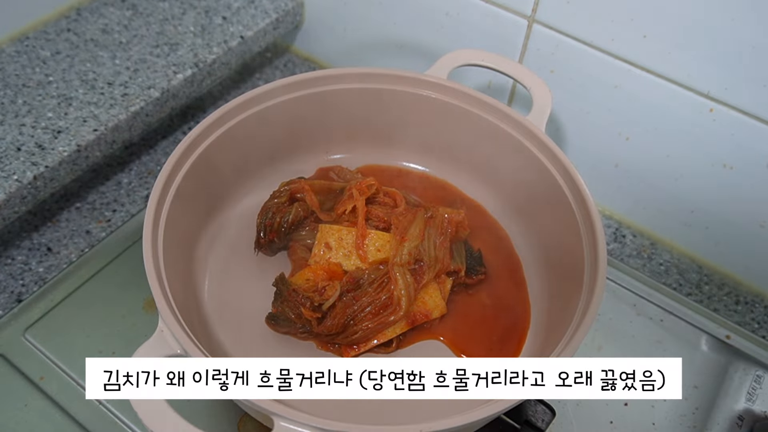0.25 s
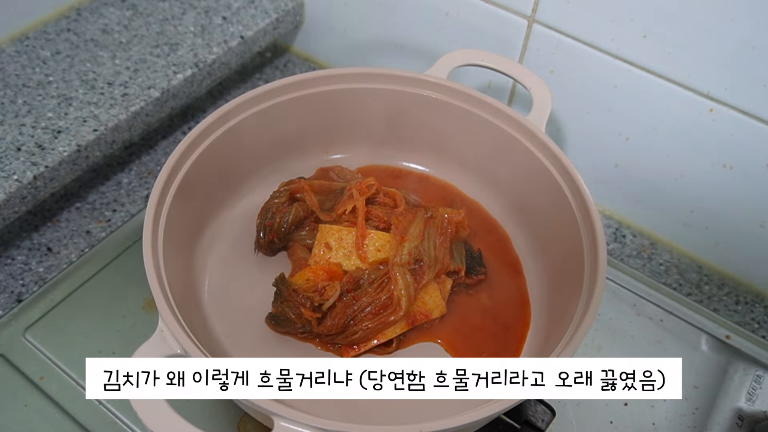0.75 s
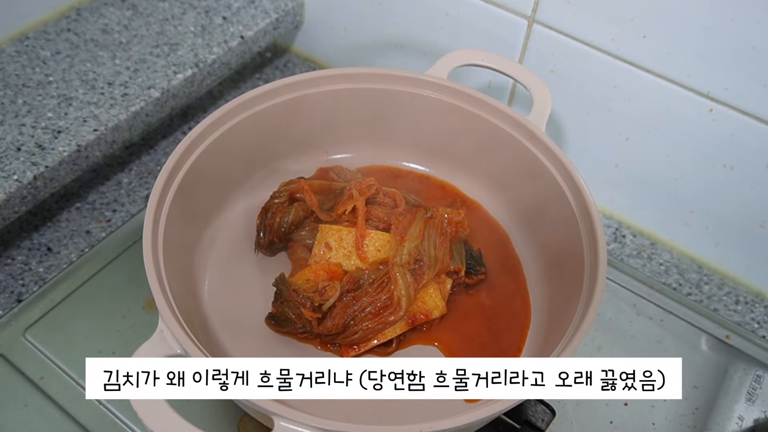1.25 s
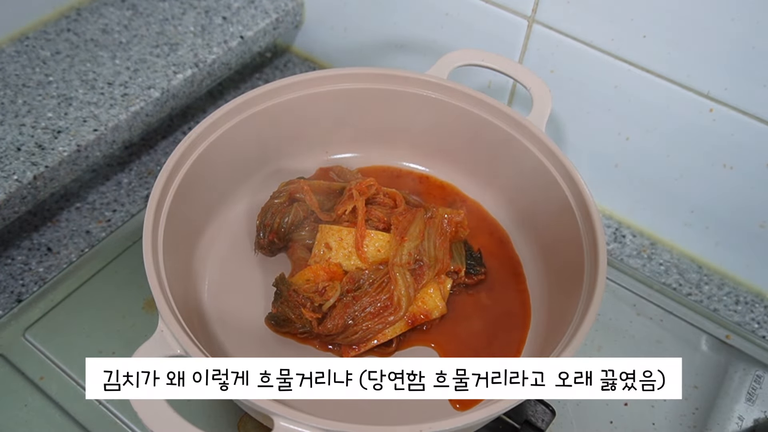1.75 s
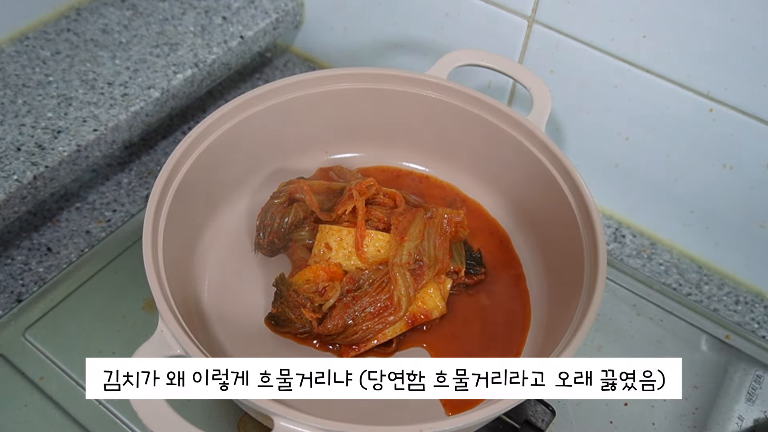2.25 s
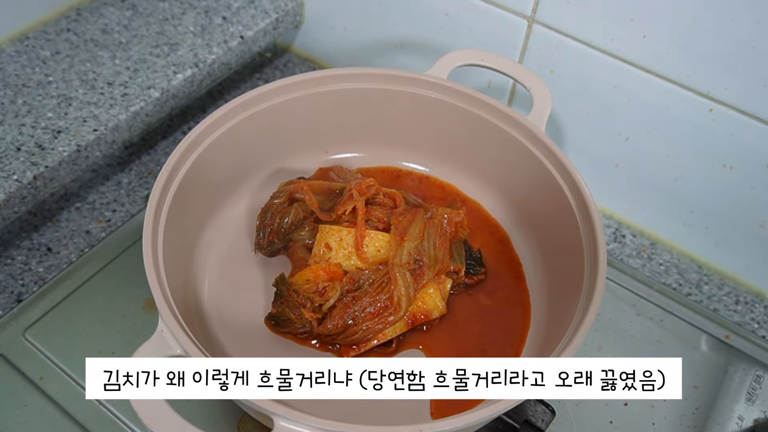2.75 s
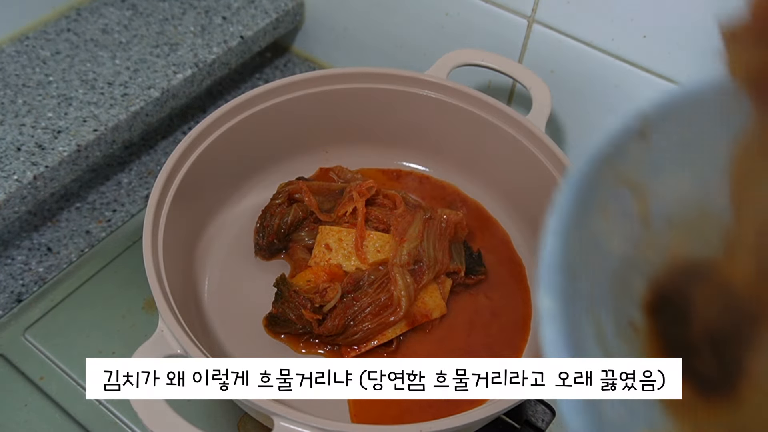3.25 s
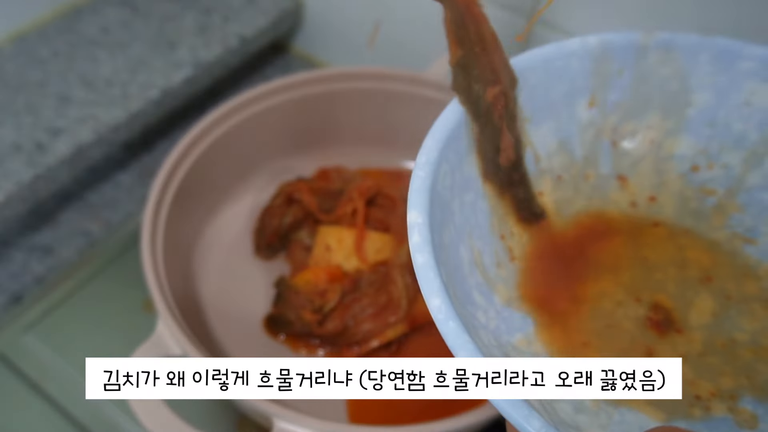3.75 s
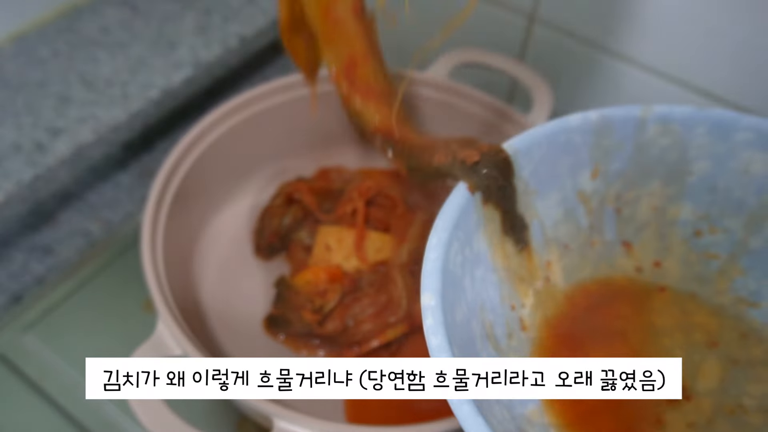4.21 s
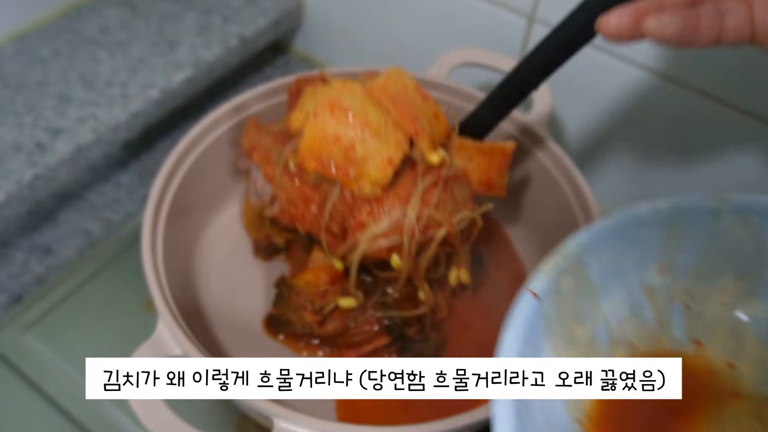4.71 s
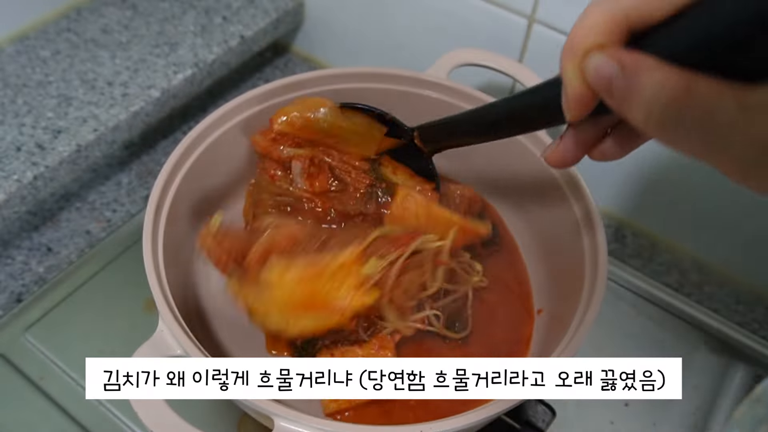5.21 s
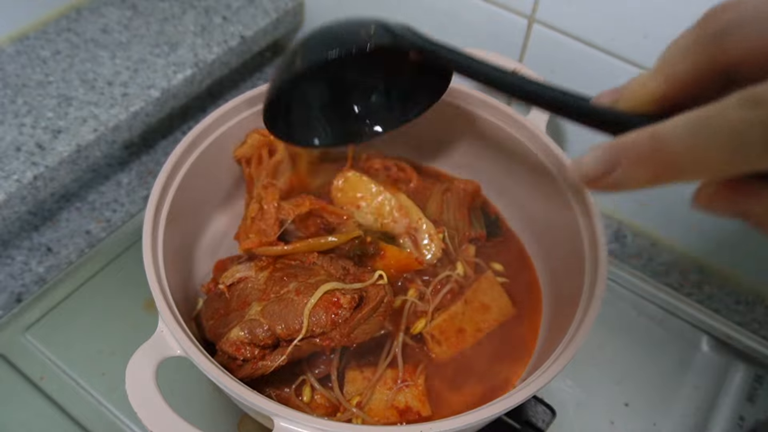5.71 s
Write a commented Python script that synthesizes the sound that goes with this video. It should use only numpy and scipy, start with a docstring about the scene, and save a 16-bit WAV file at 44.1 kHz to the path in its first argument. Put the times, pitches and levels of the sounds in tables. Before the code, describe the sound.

A gas hob is lit at close range: knob knocks and a hollow case thump, then sharp, bright igniter ticks about ten a second, with low ignition puffs among them. The ticking stops and a soft steady flame remains over quiet room tone. Later, sauce drips and a crisp splat lead into soggy cabbage slopping into the pot with wet pops and small bubbles. Mono, short bright kitchen echo.

```python
"""Lighting the hob under kimchi stew

Close up in a small tiled kitchen, a hob knob clunks in: band-shaped knocks over a thumping, ringing metal case.
An igniter snaps about ten times a second, each spark a cluster of reflections coloured by the pot and burner.
The gas catches in three low noise puffs and burns on as a flickering noise roar and a resonant hiss.
Wet kimchi is then ladled from bowl to pot: swells of sloshing noise and bubble chirps, with pops and splats."""
import sys
import numpy as np
from scipy import signal
from scipy.fft import rfft, irfft
from scipy.io import wavfile

SR = 44100
rng = np.random.default_rng(int(sys.argv[2]) if len(sys.argv) > 2 else 0)


def unload_audio(sound):
    """Save the sound as a 16-bit wav file, at the path given as the first command line argument."""
    columns = np.transpose(np.atleast_2d(sound))
    # keep every value between -1 and 1, then stretch to whole-number steps
    steps = np.round(np.clip(columns, -1, 1) * 32767)
    wavfile.write(sys.argv[1], SR, steps.astype(np.int16))


N = 263277
TIME = np.arange(N) / SR

# Kitchen reverberation: [f/Hz, t60/s]
KITCHEN_DECAY = [(150, 0.29), (1200, 0.36), (3000, 0.25), (7000, 0.24), (15000, 0.23)]
# Room tone, relative spectrum: [f/Hz, level/dB per Hz]
ROOM_TONE_SPECTRUM = [(25, -4), (120, 0), (400, -15.5), (1100, -4), (2100, -10.5), (4500, -29), (9000, -24),
                      (15500, -27), (16200, -55)]

# Knocks of the knob and its valve: [t/s, level/dB over the first 5 ms, centre f/Hz, width/octaves, t60/s]
KNOB_KNOCKS = [(.0005, -40.5, 596, 1.06, 0.11), (0.0162, -31.5, 205, 1, 0.14),
               (0.0217, -35.5, 1492, 0.64, 0.13), (0.044, -38, 3450, 0.77, 0.072),
               (0.0504, -39.5, 704, 0.19, 0.057), (.776, -39, 680, 0.26, 0.099),
               (0.7994, -16, 2410, 0.22, 0.004), (0.8006, -21.5, 2400, 0.74, 0.045),
               (.809, -30, 644, 0.41, 0.036)]
# Jolts of the sheet-metal case; the thump level is before its build-up:
# [t/s, thump level/dB, ring level/dB, build-up/s, thump t60/s]
CASE_JOLTS = [(0.0253, -18, -56, 0.072, 0.31), (0.0442, -40, -37, .02, 0.28),
              (0.821, -28.5, -36, 0.013, 0.16)]
# Ringing modes of the case, relative to the ring level: [f/Hz, level/dB, t60/s]
CASE_MODES = [(340, -8.5, 0.22), (670, 1.5, 0.15), (1130, -11, 0.3), (2520, -0.5, 0.05), (2880, 4.5, 0.049),
              (3214, -7, 0.066), (4070, 2, 0.1), (4320, -4, 0.094), (4600, -2, 0.066), (4940, -4, 0.087)]
CASE_THUMP_HZ = 53.5

# Spark colour between burner and pot, in fully heated air: [f/Hz, level/dB]
SPARK_SPECTRUM = [(150, -30.5), (350, -22), (580, -13.5), (830, -14.5), (1200, -3.5), (1850, -7),
                  (2300, -9), (3000, -10), (4300, -2.5), (5600, -1.5), (6800, 1.5), (10200, -0.5),
                  (12300, -13.5), (15500, -10.5)]
# Resonances and notches of the pot and burner cap: [f/Hz, width/Hz, level/dB]
POT_MODES = [(408, 82, -11), (500, 30, 5), (685, 42, 8), (1420, 55, 4.5), (1780, 68, 5), (2163, 224, -9.5),
             (4210, 370, 1.5), (5320, 220, 2.5), (6640, 230, 7.5), (7220, 130, 7), (7783, 94, 3.5),
             (8800, 100, 0)]
# The flame heats the air round the igniter: [t/s, speed of sound as a share of its hot value]
AIR_HEATING = [(.42, 0.93), (.52, 1), (1.3, 1)]
# Spark strength over time: [t/s, level/dB]
SPARK_STRENGTH = [(0.25, -21), (0.5, -19.5), (1.0, -19.5), (1.32, -21), (1.75, -19.5), (2.33, -20)]
# A steady pace, but the first few gaps are shorter, gaining HURRY_S in all
FIRST_SPARK_S, SPARK_PERIOD_S, HURRY_S, SETTLE_S = 0.2102, 0.10112, 0.0048, 0.273

# Roar of the steady flame, relative spectrum: [f/Hz, level/dB per Hz]
ROAR_SPECTRUM = [(20, -19), (45, -12.5), (90, -0.5), (140, 0.5), (250, -6), (420, -16), (700, -8),
                 (850, -22.5), (1150, -10), (1450, -13), (1650, -20), (1900, -10.5), (2200, -40),
                 (4000, -56)]
# Hiss of the gas jet, relative spectrum before its resonances: [f/Hz, level/dB per Hz]
HISS_SPECTRUM = [(1200, 1), (2600, -8), (3400, 0), (5000, -2.5), (6300, 2.5), (8500, -3), (10200, -5),
                 (13000, -10.5), (15500, -10), (16200, -33)]
# Whistling resonances of the gas jet: [f/Hz, width/Hz, level/dB]
JET_MODES = [(4400, 650, 6.5), (5600, 580, 6), (7700, 490, 5.5), (9400, 220, 3.5), (10970, 620, 7),
             (12300, 320, 7), (13950, 600, 6)]
# Flame strength over time: [t/s, level/dB]
FLAME_STRENGTH = [(.43, 2), (2.5, -1), (2.85, -0.5), (3.1, 0.5), (3.45, .5), (3.9, -1), (4.4, 0.5),
                  (5.2, 0), (5.97, 0)]
LIT_S = 0.37
# Puffs as the flame runs round the burner: [t/s, level/dB, length/s, brightness/dB per octave]
IGNITION_PUFFS = [(0.419, -25, 0.038, -1), (0.474, -25.5, 0.045, 1), (0.531, -25, 0.03, 1)]
# Colour shared by the puffs, before each one's brightness tilt: [f/Hz, level/dB]
PUFF_SPECTRUM = [(25, -18), (70, -6), (110, -4.5), (145, 3.5), (200, 2), (270, 1), (410, -12), (500, -6),
                 (670, -5), (830, -10.5), (1400, -14.5), (2200, -32), (3000, -31), (5000, -52)]

# Knock of the bowl being picked up: [level/dB over the first 5 ms, centre f/Hz, width/octaves, t60/s]
BOWL_KNOCK = (-44.5, 1098, 0.35, 0.37)
BOWL_S = 2.6235
# Food moves (bowl brought over, scoop, lift, soft slosh, drop, spread, last slop):
# [peak t/s, rise/s, fall/s, slosh level/dB, squelch level/dB, prickle level/dB]
FOOD_MOVES = [(3.22, 0.25, 0.14, -58, -69, -74), (4.785, 0.024, 0.051, -50.5, -63, -69),
              (4.94, 0.11, 0.049, -58, -58.5, -53), (5.07, 0.069, 0.037, -51, -57, -67),
              (5.32, 0.04, 0.076, -44, -45, -54), (5.58, 0.31, 0.49, -48, -57.5, -60),
              (5.91, 0.023, 0.032, -39.5, -49.5, -74)]
# Colour of sloshing, relative spectrum: [f/Hz, level/dB]
SLOSH_SPECTRUM = [(90, -19), (160, 0), (260, -9), (380, -19), (480, -3), (680, 1), (860, -4), (1150, 4),
                  (1900, -0.5), (2300, -8.5), (3500, -9.5), (7000, -23)]
# Low bumps as the pot is nudged: [peak t/s, rise and fall/s, level/dB]
POT_NUDGES = [(4.57, 0.05, -49), (4.798, 0.05, -53), (5.447, 0.084, -47.5), (5.93, 0.04, -54)]
# Loudest wet pops of the kimchi: [t/s, level/dB over the first 5 ms, centre f/Hz, width/octaves]
LEAF_POPS = [(3.1063, -46, 3540, 0.34), (4.711, -47, 2470, 0.17), (4.804, -44.5, 4840, 0.22),
             (4.908, -40.5, 1200, 0.12), (4.9676, -44.5, 7800, 0.33), (5.252, -35, 2270, 0.4),
             (5.267, -41, 1710, 0.93), (5.279, -31.5, 1360, 0.38), (5.3068, -32.5, 1570, 0.87),
             (5.344, -31, 3970, 0.37), (5.361, -38.5, 1810, 0.59), (5.389, -40.5, 4400, 0.38),
             (5.436, -41, 3710, 0.22), (5.4716, -42, 2250, 0.3), (5.607, -44, 3500, 0.056),
             (5.67, -42, 6330, 0.13), (5.7156, -43.5, 6580, 0.1), (5.9184, -36, 2400, 0.71)]
SIMMER_S = 3.2
# Sauce splatting into the pot: [t/s, level/dB over the first 5 ms, t60/s, brightness/dB per octave]
SAUCE_DRIPS = [(3.6837, -41.5, 0.028, 6), (4.2056, -47, 0.02, 9), (4.45, -42, 0.11, -2),
               (4.507, -39.5, 0.12, -1), (4.518, -26.5, 0.034, 0.5), (5.2007, -39.5, 0.025, -4.5)]
# Colour shared by the splats, before each one's brightness tilt: [f/Hz, level/dB]
SPLAT_SPECTRUM = [(290, -62), (500, -26), (1310, -0.5), (1900, -12.5), (2570, -19), (4130, -0.5),
                  (6180, -10.5), (8360, -4), (9650, -6), (15500, -14)]

BAND_EDGE_HZ = 16100


def gain_of(db):
    """Turns decibels into gain."""
    return 10 ** (np.asarray(db) / 20)


def evened(x):
    """Scales a sound to rms 1."""
    return x / np.sqrt(np.mean(x ** 2) + 1e-20)


def packed(x, seconds):
    """Scales a short sound to the energy of rms 1 held for so many seconds."""
    return x * np.sqrt(seconds * SR / (np.sum(x ** 2) + 1e-20))


def attack_evened(x):
    """Scales a sound so that its first 5 ms have rms 1."""
    return x / np.sqrt(np.mean(x[:SR // 200] ** 2))


def level_at(points, t):
    """Reads a table along time."""
    return np.interp(t, *np.transpose(points))


def read(points, hz):
    """Reads a table along a log-frequency axis."""
    f, value = np.transpose(points)
    return np.interp(np.log(hz + 1), np.log(f + 1), value)


def add(mix, start_s, sound):
    """Mixes a sound in at a given time."""
    part = mix[max(round(start_s * SR), 0):][:len(sound)]
    part += sound[:len(part)]


def dying(t, t60):
    """A decay of 60 dB in t60 seconds."""
    return np.exp(-np.log(1000) * t / t60)


def swell_at(peak_s, rise_s, fall_s):
    """A bell-shaped swell of height 1 with its own rise and fall."""
    width_s = np.where(TIME < peak_s, rise_s, fall_s)
    return np.exp(-.5 * ((TIME - peak_s) / width_s) ** 2)


def hump(hz, centre_hz, octaves):
    """Gain in dB of one broad, rounded peak."""
    distance = np.log2((hz + 1) / centre_hz) / octaves
    return np.maximum(-2 * distance ** 2, -50)


def bumps(modes, hz):
    """Gain in dB of a set of resonances and notches."""
    return sum(db / (1 + (2 * (hz - f) / width) ** 4) for f, width, db in modes)


def low_pass(hz, edge_hz):
    """Gain in dB of a smooth low-pass, 3 dB down at its edge."""
    return -10 * np.log10(1 + (hz / edge_hz) ** 6)


def coloured(x, curve, size=4096):
    """Minimum-phase filter whose gain in dB is curve(Hz), so nothing sounds ahead of its cause."""
    hz = abs(np.fft.fftfreq(size, 1 / SR))
    log_gain = np.log(gain_of(np.maximum(curve(hz), -90)))
    taps = np.fft.ifft(np.exp(np.conj(signal.hilbert(log_gain)))).real
    return signal.fftconvolve(x, taps[:size // 2])[:len(x)]


def noise(curve):
    """Steady noise of rms 1 with the spectrum curve(Hz) in dB."""
    spectrum = rfft(rng.standard_normal(N))
    gain = gain_of(curve(np.fft.rfftfreq(N, 1 / SR)))
    return evened(irfft(spectrum * gain, N))


def waver(edge_hz):
    """Random wandering of rms 1, mostly slower than edge_hz."""
    return noise(lambda hz: low_pass(hz, edge_hz))


def ring(modes, t):
    """Struck modes: dying sines of random sign."""
    out = np.zeros(len(t))
    for hz, db, t60 in modes:
        sign = rng.choice([-1, 1])
        out += sign * gain_of(db) * dying(t, t60) * np.sin(2 * np.pi * hz * t)
    return out


def scatter(t60, size=8192):
    """A dying cluster of reflections with a nearly even spectrum and energy 1."""
    t = np.arange(size) / SR
    x = rng.standard_normal(size) * dying(t, t60)
    # flatten the spectrum, then restore some of the decay
    for _ in range(2):
        z = rfft(x)
        x = irfft(z / (abs(z) + 1e-9)) * dying(t, 2 * t60) ** .5
    return x / np.linalg.norm(x)


def blow(db, centre_hz, octaves, t60):
    """A short knock or smack round one pitch; its level is that of the first 5 ms."""
    knock = coloured(scatter(t60), lambda hz: hump(hz, centre_hz, octaves))
    return gain_of(db) * attack_evened(knock)


def reverberation(size=16384):
    """The kitchen's echo, energy 1: it builds up in a few ms and each band dies at its own speed."""
    hz, t, z = signal.stft(rng.standard_normal(size), SR, nperseg=256)
    decay = dying(t, read(KITCHEN_DECAY, hz)[:, None])
    tail = signal.istft(z * decay, SR, nperseg=256)[1][:size]
    tail *= 1 - np.exp(-np.arange(size) / SR / 0.0015)
    return tail / np.linalg.norm(tail)


def room_tone(tone_db=-58):
    """The quiet, steady noise bed of the kitchen."""
    return gain_of(tone_db) * noise(lambda hz: read(ROOM_TONE_SPECTRUM, hz))


def knob():
    """The knob clunks in and later clicks; the case gives way, thumps and rings under it."""
    t, out = np.arange(SR // 2) / SR, np.zeros(N)
    for start_s, *shape in KNOB_KNOCKS:
        add(out, start_s, blow(*shape))
    for start_s, thump_db, ring_db, build_s, t60 in CASE_JOLTS:
        thump = -np.sin(2 * np.pi * CASE_THUMP_HZ * t) * dying(t, t60) * (1 - np.exp(-t / build_s))
        add(out, start_s, gain_of(thump_db) * thump + gain_of(ring_db) * ring(CASE_MODES, t))
    return out


def crack(db=-14, centre_hz=1250, octaves=0.68):
    """The spark's own pressure pulse, which passes under the pot on its way to the ear."""
    impulse = signal.unit_impulse(16384)
    pulse = coloured(impulse, lambda hz: hump(hz, centre_hz, octaves) + bumps(POT_MODES, hz))
    return gain_of(db) * packed(pulse, .02)


def spark_path(room_db, size=16384, gap_t60=.036, build_s=.0006):
    """One way for a spark to rattle between burner and pot and fill the room."""
    onset = 1 - np.exp(-np.arange(size) / SR / build_s)
    return onset * scatter(gap_t60, size=size) + gain_of(room_db) * reverberation(size)


def igniter(room_db=-7.5, unlike=0.4, count=22):
    """Each spark rattles between burner and pot and fills the room; the paths drift as the air warms."""
    out = np.zeros(N)
    paths = [spark_path(room_db) for _ in range(3)]
    beats = np.arange(count) * SPARK_PERIOD_S
    times = FIRST_SPARK_S + beats - HURRY_S * (1 - np.exp(-beats / SETTLE_S))
    # crossfade through the three paths in turn
    for start_s, warmth in zip(times, np.linspace(0, 2, count)):
        path = sum(np.sqrt(max(1 - abs(warmth - k), 0)) * p for k, p in enumerate(paths))
        # no two sparks jump quite the same way
        path = path + unlike * spark_path(room_db)
        speed = level_at(AIR_HEATING, start_s)
        snap = coloured(path, lambda hz: read(SPARK_SPECTRUM, hz / speed) + bumps(POT_MODES, hz))
        strength = gain_of(level_at(SPARK_STRENGTH, start_s))
        add(out, start_s, strength * (packed(snap, 0.022) + crack()))
    return out


def flame(roar_db=-50.5, hiss_db=-54, flicker_db=1.77, hiss_flicker_db=1.36):
    """Once lit, the flame roars softly and flickers while the jet hisses through the burner's resonances."""
    fade_in = np.clip((TIME - LIT_S) / 0.087, 0, 1)
    strength = gain_of(level_at(FLAME_STRENGTH, TIME)) * fade_in
    roar = noise(lambda hz: read(ROAR_SPECTRUM, hz))
    roar *= gain_of(roar_db + flicker_db * waver(19))
    hiss = noise(lambda hz: read(HISS_SPECTRUM, hz) + bumps(JET_MODES, hz))
    hiss *= gain_of(hiss_db + hiss_flicker_db * waver(16))
    return strength * (roar + hiss)


def ignition(fade_t60=0.057):
    """The gas catches in three low, ragged puffs of noise."""
    t, out = np.arange(SR // 4) / SR, np.zeros(N)
    for start_s, db, length_s, tilt in IGNITION_PUFFS:
        # quick rise, hold, then fade
        swell = np.minimum(t / 0.0032, 1) * dying(np.maximum(t - length_s, 0), fade_t60)
        breath = swell * rng.standard_normal(len(t))
        puff = coloured(breath, lambda hz: read(PUFF_SPECTRUM, hz) + tilt * np.log2((hz + 1) / 300))
        add(out, start_s, gain_of(db) * packed(puff, length_s))
    return out


def bubbles(low_hz, high_hz, per_s, cycles, spread_db, count=28):
    """Tiny bubbles of many sizes burst at random, each a few cycles that rise a little; rms 1."""
    t, out = np.arange(SR // 40) / SR, np.zeros(N)
    for hz in np.geomspace(low_hz, high_hz, count):
        age = t * hz / cycles
        chirp = np.sin(2 * np.pi * hz * t * (1 + 0.03 * np.minimum(age, 2))) * np.exp(-age)
        at = rng.integers(0, N, max(int(per_s * N / SR / count), 1))
        # a few bursts are much stronger than the rest
        strengths = gain_of(spread_db * np.minimum(rng.exponential(1, len(at)), 3.5))
        bursts = np.bincount(at, strengths, N)
        out += signal.oaconvolve(bursts, chirp / np.linalg.norm(chirp))[:N]
    return evened(out)


def food(lumpy_db=2, surge_db=0.8, gurgle_db=-4):
    """The bowl knocks; as the food moves, sauce sloshes and its films burst; the pot is nudged at times."""
    out = np.zeros(N)
    add(out, BOWL_S, blow(*BOWL_KNOCK))
    # overlapping moves add in power
    power = sum(np.outer(gain_of(levels), swell_at(peak_s, rise_s, fall_s)) ** 2
                for peak_s, rise_s, fall_s, *levels in FOOD_MOVES)
    slosh, squelch, prickle = np.sqrt(power)
    unevenness = gain_of(lumpy_db * waver(110) + surge_db * waver(23))
    out += slosh * noise(lambda hz: read(SLOSH_SPECTRUM, hz)) * unevenness
    # large bubbles gurgle, middling ones squelch, the smallest prickle
    gurgle = gain_of(gurgle_db) * slosh
    out += gurgle * bubbles(low_hz=600, high_hz=2000, per_s=150, cycles=3, spread_db=5)
    out += squelch * bubbles(low_hz=2900, high_hz=5400, per_s=400, cycles=6, spread_db=5)
    out += prickle * bubbles(low_hz=6500, high_hz=15000, per_s=220, cycles=4, spread_db=6)
    nudge = sum(gain_of(db) * swell_at(peak_s, half_s, half_s) for peak_s, half_s, db in POT_NUDGES)
    out += nudge * noise(lambda hz: low_pass(hz, 42))
    return out


def pops(pop_t60=0.017, small_db=-51, spread_db=0.5, low_hz=3300, high_hz=12000, octaves=0.17, count=18):
    """Wet leaves part with loud pops; small bubbles burst at random as the sauce starts to simmer."""
    out = np.zeros(N)
    for start_s, *shape in LEAF_POPS:
        add(out, start_s, blow(*shape, pop_t60))
    # one simmering bubble at a random moment in each equal slot
    slot_s = (N / SR - SIMMER_S) / count
    for k, (when, strength, pitch) in enumerate(rng.random((count, 3))):
        start_s = SIMMER_S + (k + when) * slot_s
        db = small_db + spread_db * (2 * strength - 1)
        centre_hz = low_hz * (high_hz / low_hz) ** pitch
        add(out, start_s, blow(db, centre_hz, octaves, pop_t60))
    return out


def drips(tilt_from_hz=500):
    """Sauce falls from the ladle and splats: clusters of reflections, each with its own brightness."""
    out = np.zeros(N)
    for start_s, db, t60, tilt in SAUCE_DRIPS:
        splat = coloured(scatter(t60), lambda hz: read(SPLAT_SPECTRUM, hz)
                         + tilt * np.log2(np.maximum(hz / tilt_from_hz, 1)))
        add(out, start_s, gain_of(db) * attack_evened(splat))
    return out


def scene(hob_room_db=-12, food_room_db=-14):
    """Hob and food share the small kitchen's echo; the sparks carry their own."""
    tone = room_tone()
    hob = knob() + ignition()
    stew = food() + pops() + drips()
    send = gain_of(hob_room_db) * hob + gain_of(food_room_db) * stew
    echo = signal.fftconvolve(send, reverberation())[:N]
    return (tone + hob + igniter() + flame() + stew + echo)[None]


def record(dry):
    """The microphone's band limit: a steep low-pass."""
    taps = signal.firwin(255, BAND_EDGE_HZ, window=("kaiser", 9), fs=SR)
    return signal.oaconvolve(dry, taps[None], "same")


dry = scene()
out = record(dry)
unload_audio(out)
```